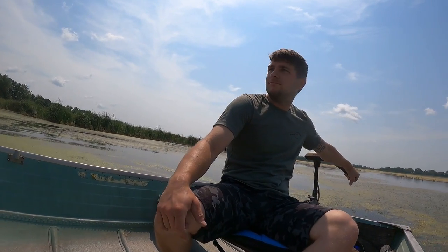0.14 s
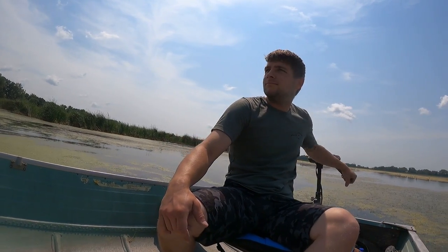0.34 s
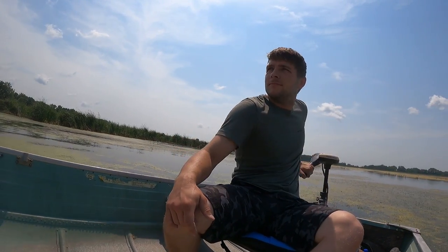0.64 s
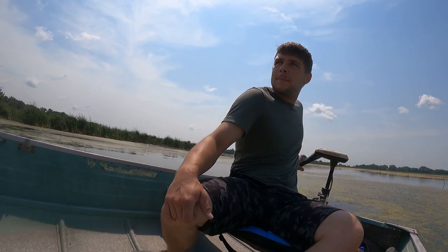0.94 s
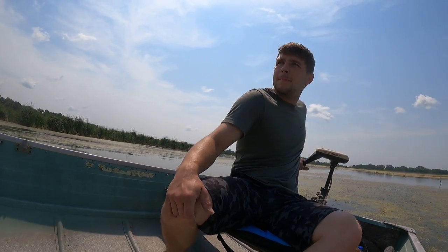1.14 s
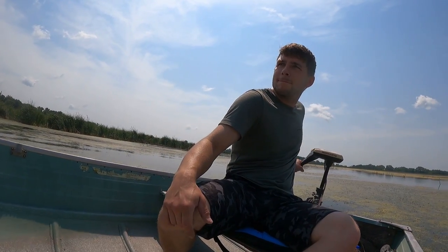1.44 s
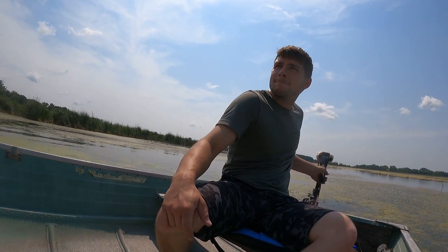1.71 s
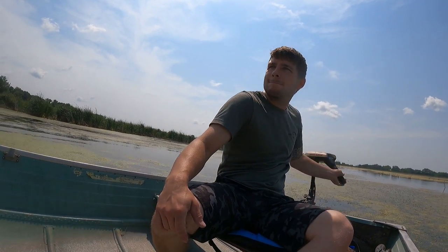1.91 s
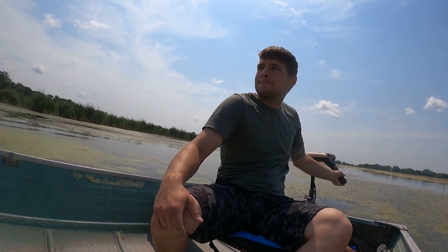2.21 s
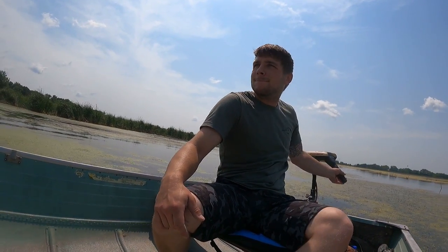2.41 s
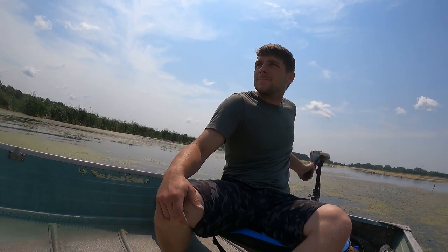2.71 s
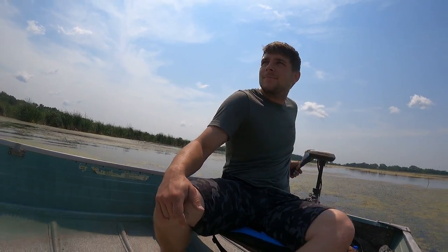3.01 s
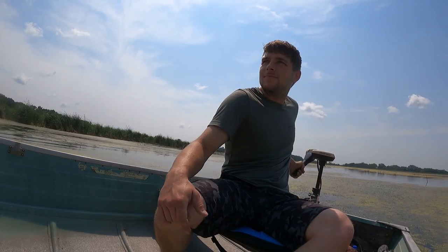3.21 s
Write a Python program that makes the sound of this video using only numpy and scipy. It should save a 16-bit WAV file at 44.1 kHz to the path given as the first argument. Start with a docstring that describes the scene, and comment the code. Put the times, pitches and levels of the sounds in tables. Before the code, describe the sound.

Heard close up on a marsh, a small boat's electric motor runs in two bursts, making the metal hull drone and rattle. Tiller clunks come in the pause and the second run, over low lapping water and faint distant chirps.

```python
"""Trolling motor on a marsh

Heard close up from a small metal boat, an electric trolling motor runs in two short bursts.
It shakes the hull, which drones in one strong mode and beats in its neighbours; the shaft rattles
and whines in spurts. The tiller clunks and ticks as it is worked, water laps and drips at the hull,
and small birds chirp far off in the reeds."""
import sys
import numpy as np
from scipy import signal
from scipy.fft import rfft, irfft
from scipy.io import wavfile
from scipy.ndimage import uniform_filter1d

SR = 44100
rng = np.random.default_rng(int(sys.argv[2]) if len(sys.argv) > 2 else 0)


def bounce(signal):
    """Save signal as a 16-bit WAV file at the path given by the first command-line argument."""
    frames = np.transpose(np.atleast_2d(signal))
    limited = np.clip(frames, -1, 1)
    pcm = np.round(limited * 32767).astype(np.int16)
    wavfile.write(sys.argv[1], SR, pcm)


N = 147735
SHAFT_HZ = 31
DRONE_HZ, DRONE_WANDER_HZ, DRONE_GAIN_DB = 276.2, 1.596, -2.06

# The hull's main mode, close by, one curve per run: time_s, level_db
DRONE_CURVES = [
    [(0.2, -39), (0.256, -23), (0.278, -11.5), (0.304, -21), (0.348, -7.5), (0.496, -12.5), (0.602, -22.5),
     (0.642, -8), (0.686, -8), (0.788, -10), (0.838, -23), (0.904, -20.5), (0.942, -36.5), (0.974, -25),
     (1.022, -32.5), (1.08, -59)],
    [(1.47, -46), (1.502, -13), (1.778, -37), (1.838, -11.5), (1.886, -25.5), (2.084, -12), (2.124, -26.5),
     (2.216, -12), (2.254, -25), (2.608, -14.5), (2.724, -25), (2.762, -13), (2.84, -10), (2.874, -28),
     (3.045, -22), (3.2, -41.5)],
]
# Unsteadiness of that mode, one value per run: roughness (0-1)
DRONE_ROUGHNESS = [.1, .32]
def drone(t):
    """The hull's main mode swells and sags with the load and throbs at the shaft rate."""
    out = 0
    for curve, roughness in zip(DRONE_CURVES, DRONE_ROUGHNESS):
        level_db = np.interp(t, *np.array(curve).T, left=-120, right=-120)
        level = uniform_filter1d(undb(level_db), size=300)
        phase = 2 * np.pi * np.cumsum(DRONE_HZ + DRONE_WANDER_HZ * walk(12)) / SR
        throb = shaft_pulse(depth=1.5 * roughness, wander=0.0904, wander_per_s=17)
        jitter = roughness * walk(70)
        out = out + level * (throb * np.sin(phase) + jitter * np.cos(phase))
    return undb(DRONE_GAIN_DB) * np.sqrt(2) * out


# Thumps of the churning propeller, heard through the hull: start_s, level_db
JOLTS = [(1.495, -10), (1.575, -11.5), (2.291, -8.5), (2.482, -11.5), (2.542, -13), (2.995, -17.5)]
def jolts(t, length_s=0.023):
    """Each jolt of the propeller makes the hull's main mode swell for a few cycles."""
    out = 0
    for (start, db), angle in zip(JOLTS, rng.random(len(JOLTS))):
        out = out + undb(db) * arch(t, start, length_s) * np.sin(2 * np.pi * (DRONE_HZ * t + angle))
    return out


# The motor's two bursts: on_s, off_s, rattle_db, shake_db, kick_db
MOTOR_RUNS = [(0.216, 0.828, -4, -3.5, 9.5), (1.484, 3.004, -2.13, 0.5, 2)]
# Side modes of the hull around the microphone: pitch_hz, width_hz, level_db
HULL_MODES = [(235.6, 29, -30.5), (282, 23.4, -25.5), (305.1, 19, -27.5), (346.7, 43, -31),
              (582, 90, -37.5)]
# Tone of the rattling shaft and mount: frequency_hz, relative_db
RATTLE_SPECTRUM = [(60, -5), (200, -9.5), (400, 2), (480, 1), (640, -2), (720, -3), (1250, -8.5),
                   (1600, -15.5), (2100, -24.5), (4000, -33), (5000, -38), (6500, -47), (8700, -50.5),
                   (10500, -64), (15000, -70.5)]
def motor(t, rattle_db=-30.5, impacts_per_s=1500):
    """Dense little impacts, swelling once a shaft turn, rattle the mount; the hull rings along."""
    drive = sum(undb(db) * effort(t, on, off, kick) for on, off, db, _, kick in MOTOR_RUNS)
    shake = sum(undb(db) * effort(t, on, off, kick) for on, off, _, db, kick in MOTOR_RUNS)
    turn = shaft_pulse(depth=0.11, wander=0.09, wander_per_s=10)
    impacts = unit((rng.random(N) < impacts_per_s / SR) * np.sign(noise()))
    force = unit(turn * (impacts + noise()))
    rattle = undb(rattle_db) * colour(force * drive, RATTLE_SPECTRUM)
    hull = sum(undb(db) * unit(resonate(noise() * turn, hz, width)) for hz, width, db in HULL_MODES)
    return rattle + shake * hull


# Moments when the shaft rubs harder: centre_s, level_db
RUB_SPURTS = [(0.33, 2.5), (0.491, -0.5), (0.525, 1), (0.611, 2.5), (0.759, -5.5), (2.37, -6), (2.46, 2),
              (2.545, 1.5), (2.75, -3), (2.809, -3), (2.9, -5.5), (2.995, -4)]
# Thin rings of the motor housing: pitch_hz, width_hz, level_db
HOUSING_MODES = [(3610, 140, -61.5), (4375, 75, -59.5), (5226, 87, -61), (6220, 120, -70.5),
                 (7200, 120, -74)]
def whine(t, spurt_s=0.022, steady_db=-13, flutter_db=2.5, rasp_db=-61):
    """The turning shaft rubs lightly, and harder in spurts, rasping and ringing the motor housing."""
    spurt_power = sum((undb(db) * np.exp(-((t - at) / spurt_s) ** 2)) ** 2 for at, db in RUB_SPURTS)
    steady = undb(steady_db) * sum(effort(t, on, off, kick_db=0) for on, off, *_ in MOTOR_RUNS)
    rub = np.hypot(np.sqrt(spurt_power), steady)
    rasp = undb(rasp_db) * resonate(noise(), hz=3600, width=2100)
    flutter = unit(undb(flutter_db * walk(2 * SHAFT_HZ)))
    housing = sum(undb(db) * resonate(noise(), hz, width) for hz, width, db in HOUSING_MODES)
    return rub * flutter * (rasp + housing)


RING_LAG_S, RING_FOCUS_DB_PER_OCT = 0.0022, 12
SNAP_DB, SNAP_T60_S, CLACK_DB = 5, 0.011, 6.5
# Clunks of the tiller, within arm's reach: start_s, level_db, crack_db, rise_s, centre_hz
CLUNKS = [(0.857, -1, 0, 0.0012, 1110), (1.143, -0.5, -1.5, 0.0089, 1230), (1.165, 0, -1, 0.0012, 1360),
          (1.196, 0.5, -4, 0.0005, 1300), (1.886, -3.5, 1.5, 0.0063, 1140), (1.910, -1.5, 2, 0.0016, 1400),
          (1.9535, -1, -1.5, 0.00066, 1254)]
# Modes of the motor mount: pitch_hz, level_db, t60_s
MOUNT_MODES = [(575, 8, 0.29), (902, -3.5, 0.17), (1103.5, 6, 0.125), (1218, 4, 0.12), (1405, -1, 0.1),
               (1585, 1, 0.085), (2285, -0.5, 0.14), (3150, -6, 0.048)]
# Tone of a clunk's crack: frequency_hz, relative_db
CRACK_SPECTRUM = [(80, -33), (270, 1), (600, 1), (1250, 0.5), (2000, -11), (3000, -16), (4500, -24),
                  (6500, -30.5), (8500, -39.5), (15000, -58.5)]
# Light ticks of the throttle grip: start_s, level_db
GRIP_TICKS = [(1.038, -12.5), (1.311, -16), (1.826, -2.5), (2.162, -12.5), (3.086, -4.5), (3.129, -9),
              (3.234, -17)]
# Tone of the ticks and of each clunk's bright clack: frequency_hz, relative_db
TICK_SPECTRUM = [(400, -10.5), (1000, 1.5), (1700, 7), (2600, -5), (3200, -1.5), (4000, -7.5), (4900, -5),
                 (5700, -20.5), (6700, -6.5), (7500, -24), (9000, -19.5), (11000, -35.5), (13000, -35),
                 (16000, -50)]
def tiller(t, ring_gain_db=-31, crack_gain_db=-23.5, tick_gain_db=-35):
    """Each clunk cracks, then rings the mount modes its point of contact favours; the grip ticks."""
    rings, cracks = 0, 0
    ticks = sum(undb(db) * strike(t, start, t60=0.08, rise=0.00056) for start, db in GRIP_TICKS)
    for start, db, crack_db, rise, centre_hz in CLUNKS:
        for hz, mode_db, t60 in MOUNT_MODES:
            detune, angle = rng.uniform(-0.87, 1, 2)
            level = undb(db + mode_db - RING_FOCUS_DB_PER_OCT * abs(np.log2(hz / centre_hz)))
            phase = 2 * np.pi * hz * (1 + 0.016 * detune) * (t - start) + np.pi * angle
            rings = rings + level * fade(t, start + RING_LAG_S, t60, rise) * np.sin(phase)
        cracks = cracks + undb(db + crack_db) * strike(t, start, t60=0.099, rise=rise)
        ticks = ticks + undb(db + crack_db + CLACK_DB) * fade(t, start, SNAP_T60_S, rise)
    cracking = undb(crack_gain_db) * colour(cracks * noise(), CRACK_SPECTRUM)
    ticking = undb(tick_gain_db) * colour(ticks * noise(), TICK_SPECTRUM)
    return undb(ring_gain_db) * rings + cracking + ticking


# Tone of the water just over the side: frequency_hz, relative_db
LAP_SPECTRUM = [(20, -5.5), (60, 2), (150, -7), (300, -2.5), (450, -18), (700, -26.5), (1000, -26),
                (1600, -39), (2500, -45.5), (4800, -50.5), (10000, -67.5), (15000, -85)]
# Rise and fall of the low rumble underfoot: time_s, level_db
RUMBLE_CURVE = [(0.0, -17.5), (0.1, -28), (0.24, -19), (0.71, -48.5), (0.75, -23.5), (1.12, -39),
                (1.17, -18.5), (1.43, -37.5), (1.54, -22), (1.67, -33.5), (2.04, -16.5), (2.14, -28),
                (3.35, -30)]
# Resonances of that rumble: pitch_hz, width_hz, level_db
RUMBLE_MODES = [(85.5, 13, -9), (147.6, 134, -7)]
# Slaps of water that boom in the hull: start_s, length_s, pitch_hz, width_hz, level_db
SLAPS = [(-0.1, 0.56, 142.6, 29.8, -30.5), (1.869, .26, 120, 89.4, -31.5)]
def water(t, lap_db=-34.5, swell_db=1.5):
    """Water laps against the boat, with the hull rumbling and booming under it."""
    lap = undb(lap_db) * colour(noise() * unit(undb(swell_db * walk(4.8))), LAP_SPECTRUM)
    rumble_level = undb(np.interp(t, *np.array(RUMBLE_CURVE).T))
    rumble = sum(undb(db) * unit(resonate(noise(), hz, width)) for hz, width, db in RUMBLE_MODES)
    booms = sum(undb(db) * arch(t, start, length) * resonate(noise(), hz, width)
                for start, length, hz, width, db in SLAPS)
    return lap + rumble_level * rumble + booms


# Soft drips alongside the boat: start_s, level_db, pitch_hz
DRIPS = [(0.045, -46, 2300), (0.179, -47.5, 2000), (0.939, -51, 2000), (1.015, -49.5, 1800),
         (1.268, -50.5, 2190), (1.446, -53.5, 2900)]
def drips(t):
    """Each small splash is a quick puff of noise around its own pitch."""
    return sum(undb(db) * fade(t, start, t60=0.06, rise=0.0007) * resonate(noise(), hz, width=0.8 * hz)
               for start, db, hz in DRIPS)


# Small birds far off across the marsh: start_s, length_s, from_hz, to_hz
CHIRPS = [(0.08, 0.1, 4500, 5000), (0.974, 0.013, 4800, 4930), (1.366, 0.019, 5800, 4970),
          (1.41, 0.015, 4950, 4860)]
def birds(t, level_db=-65, waver_hz=170):
    """Faint, slightly wavering glides carry from the reeds."""
    out = 0
    for start, length, from_hz, to_hz in CHIRPS:
        glide_hz = np.interp(t, [start, start + length], [from_hz, to_hz])
        phase = 2 * np.pi * np.cumsum(glide_hz + waver_hz * walk(600)) / SR
        out = out + arch(t, start, length) * np.sin(phase)
    return undb(level_db) * out


def effort(t, on, off, kick_db, attack_s=0.018, settle_s=0.32, coast_s=0.056):
    """The motor bites at once, settles, and coasts down when switched off."""
    age = np.maximum(t - on, 0)
    bite = 1 - np.exp(-age / attack_s)
    kick = undb(kick_db * np.exp(-age / settle_s))
    coast = np.exp(-np.maximum(t - off, 0) / coast_s)
    return bite * kick * coast


def shaft_pulse(depth, wander, wander_per_s):
    """A gain that swells once per turn of the slightly unsteady shaft."""
    turn_hz = SHAFT_HZ * (1 + wander * walk(wander_per_s))
    return 1 + depth * np.sin(2 * np.pi * np.cumsum(turn_hz) / SR)


def strike(t, start, t60, rise):
    """The envelope of a short snap and its longer tail."""
    return fade(t, start, t60, rise) + undb(SNAP_DB) * fade(t, start, SNAP_T60_S, 2 * rise)


def fade(t, start, t60, rise):
    """A quick rise and an exponential decay."""
    age = np.maximum(t - start, 0)
    return (1 - np.exp(-age / rise)) * np.exp(-np.log(1000) * age / t60)


def arch(t, start, length):
    """A half-sine swell."""
    return np.sin(np.pi * np.clip((t - start) / length, 0, 1))


def resonate(x, hz, width):
    """A steep resonance that keeps the power of white noise."""
    b, a = signal.iirpeak(hz, hz / width, fs=SR)
    return signal.lfilter(b, a, signal.lfilter(b, a, x)) * np.sqrt(2 * SR / (np.pi * width))


def colour(x, points):
    """Shape a sound by (Hz, dB) points, keeping the power of white noise."""
    hz, db = np.array(points).T
    bins_hz = np.maximum(np.fft.rfftfreq(2 * N, 1 / SR), 1)
    gain = unit(undb(np.interp(np.log(bins_hz), np.log(hz), db)))
    return irfft(rfft(x, 2 * N) * gain, 2 * N)[:N]


def walk(rate):
    """Random levels held 1 / rate s and smoothed twice."""
    hold = int(SR / rate)
    steps = np.repeat(noise()[:N // hold + 1], hold)
    return unit(uniform_filter1d(uniform_filter1d(steps, hold), hold)[:N])


def noise():
    return rng.standard_normal(N)


def unit(x):
    return x / np.sqrt(np.mean(x ** 2) + 1e-18)


def undb(db):
    return 10 ** (np.asarray(db) / 20)


def scene():
    """Boat and water close by, birds far off, all at one microphone."""
    t = np.arange(N) / SR
    boat = drone(t) + jolts(t) + motor(t) + whine(t) + tiller(t)
    return (boat + water(t) + drips(t) + birds(t))[None]


def record(dry, top_hz=14900):
    """The camera's microphone channel cuts the top treble steeply."""
    return signal.sosfilt(signal.ellip(8, .2, 70, top_hz, fs=SR, output="sos"), dry)


dry = scene()
out = record(dry)
bounce(out)
```